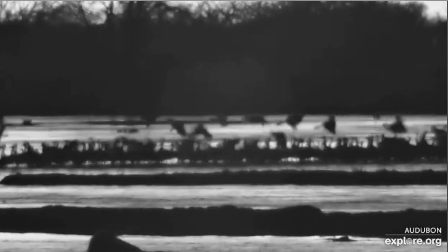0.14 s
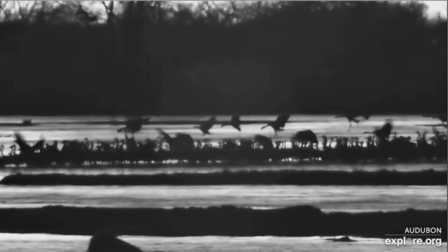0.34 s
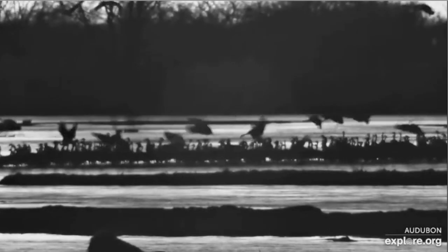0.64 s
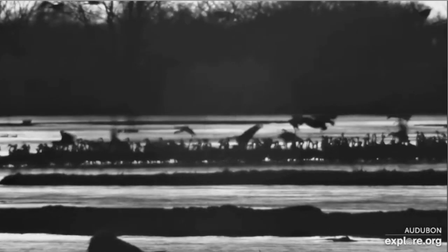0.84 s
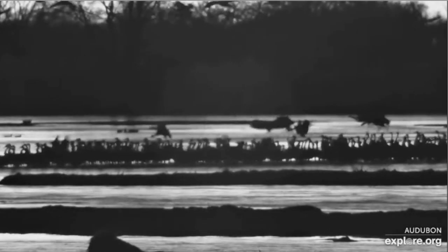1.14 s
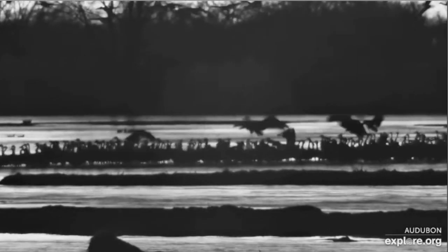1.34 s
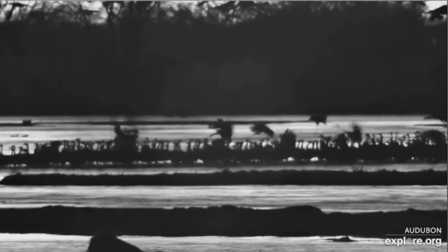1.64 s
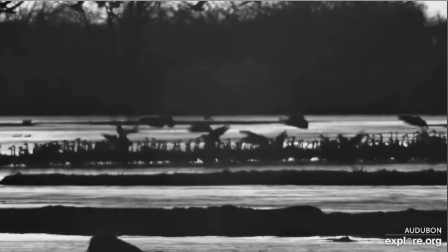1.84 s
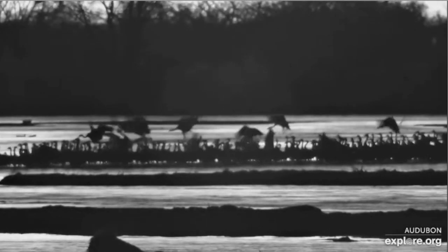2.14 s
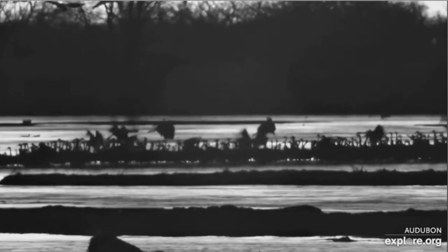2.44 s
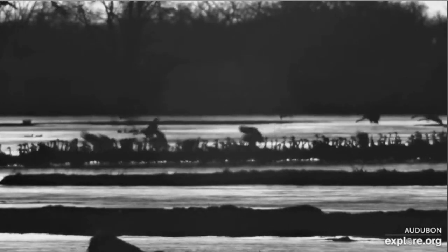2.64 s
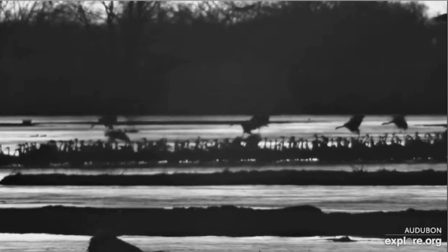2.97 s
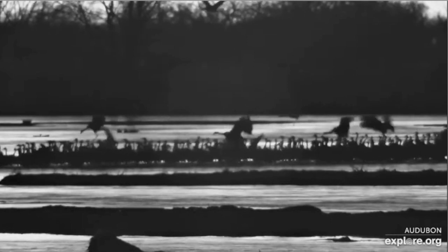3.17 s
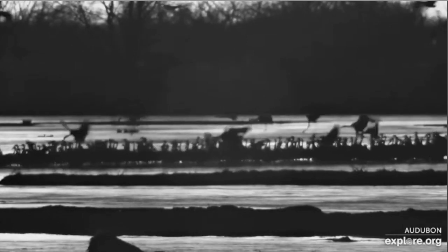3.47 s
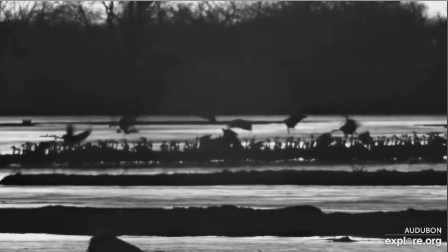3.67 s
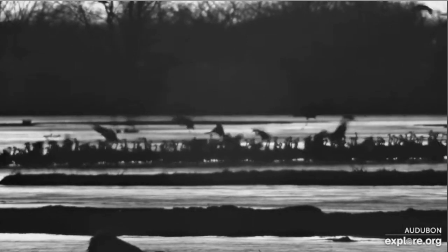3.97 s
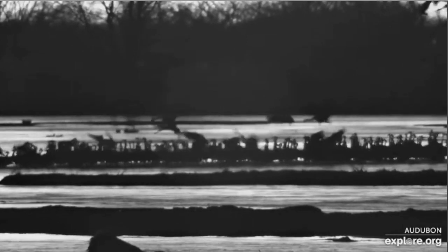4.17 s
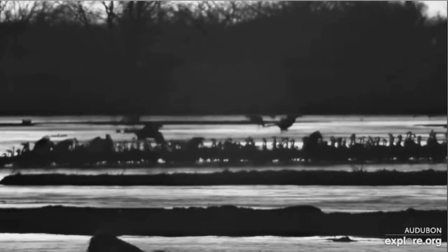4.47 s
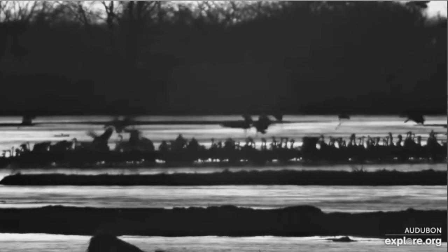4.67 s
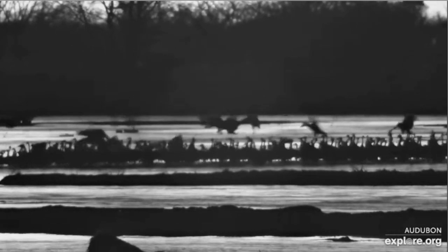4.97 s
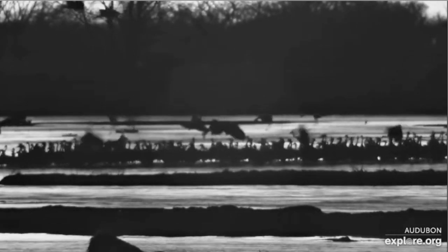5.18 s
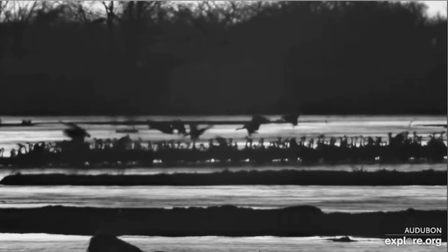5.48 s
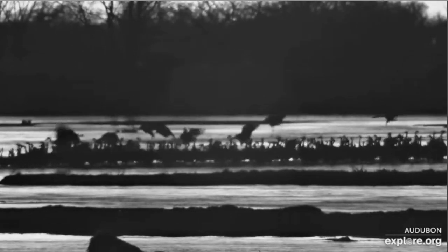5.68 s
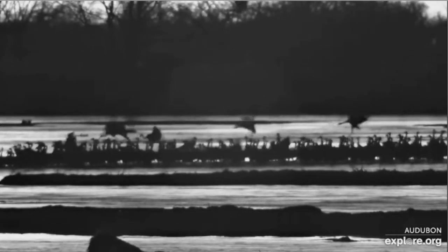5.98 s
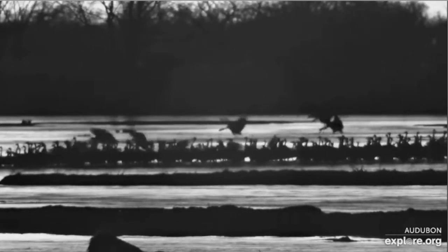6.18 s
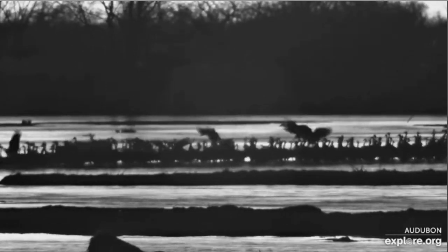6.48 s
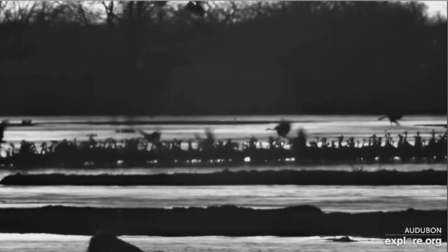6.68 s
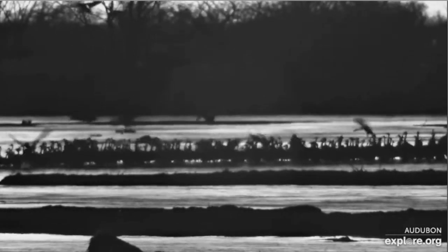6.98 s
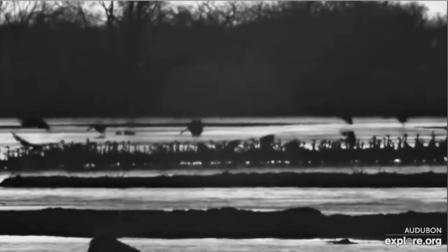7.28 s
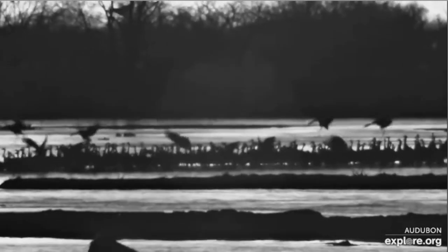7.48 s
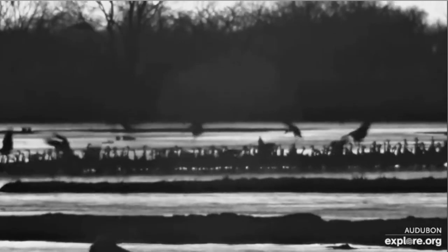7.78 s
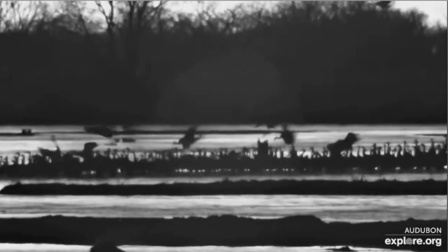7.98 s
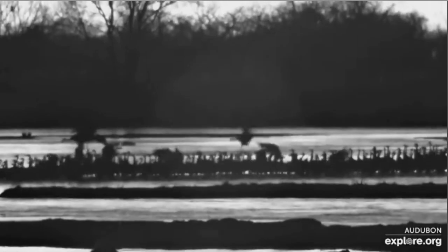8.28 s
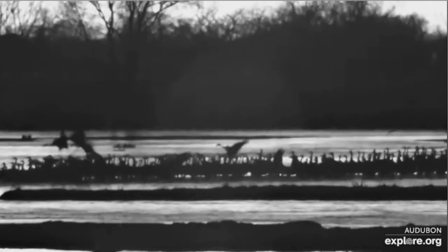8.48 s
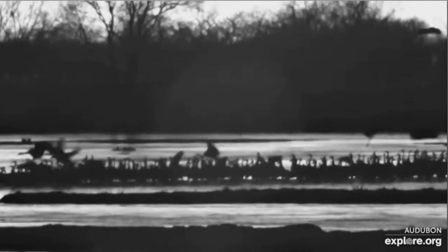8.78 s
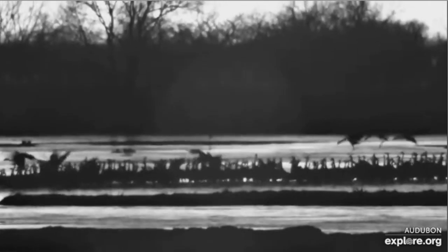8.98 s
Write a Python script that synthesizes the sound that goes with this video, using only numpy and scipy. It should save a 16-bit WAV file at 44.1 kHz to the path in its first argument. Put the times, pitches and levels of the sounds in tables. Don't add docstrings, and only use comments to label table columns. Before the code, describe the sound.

Hundreds of distant cranes trumpet and rattle together outdoors, with closer purring calls, short bugles, thin young whistles and later deep honks.

```python
import sys
import numpy as np
from scipy import signal
from scipy.fft import rfft, irfft, next_fast_len
from scipy.io import wavfile
from scipy.ndimage import uniform_filter1d

SR = 44100
rng = np.random.default_rng(int(sys.argv[2]) if len(sys.argv) > 2 else 0)


def persist_wave(psi):
    counts = np.round(np.clip(psi, -1, 1) * 32767).astype(np.int16)
    wavfile.write(sys.argv[1], SR, np.atleast_2d(counts).T)


def undo_db(level):
    steps = np.asarray(level, float) / 20
    return 10 ** steps


N = 402191


def evened(x):
    return x / np.sqrt(np.mean(x ** 2) + 1e-20)


def steadied(x):
    return x / np.sqrt(abs(uniform_filter1d(x ** 2, size=5000)))


def read(points, hz):
    f, value = np.transpose(points)
    return np.interp(np.log(hz + 1), np.log(f + 1), value, left=-150, right=-150)


def curve(rows, column):
    return np.interp(np.arange(N) / SR, *np.transpose(rows)[[0, column]])


def colour(x, points):
    size = next_fast_len(N)
    gain = undo_db(read(points, np.fft.rfftfreq(size, 1 / SR)))
    return irfft(rfft(x, size) * gain, size)[:N]


def add(mix, s, sound):
    part = mix[max(round(s * SR), 0):][:len(sound)]
    part += sound[:len(part)]


def arch(length, start_hz, mid_hz, end_hz, wobble):
    u = np.linspace(-1, 1, round(length * SR))
    hz = mid_hz + (start_hz - mid_hz) * u * (u - 1) / 2 + (end_hz - mid_hz) * u * (u + 1) / 2
    shake = np.interp(np.arange(len(u)) / 120, np.arange(100), rng.standard_normal(100))
    return hz, np.cumsum(hz * (1 + wobble * shake)) / SR


def pulses(turns, count):
    half = np.pi * turns
    return (np.sin((2 * count + 1) * half) / (np.sin(half) + 1e-9) - 1) / 2


def valley(x, t60, wet_db):
    t = np.arange(SR // 3) / SR
    tail = rng.standard_normal(len(t)) * undo_db(-60 * t / t60) * (t > .004)
    return x + undo_db(wet_db) * signal.oaconvolve(x, tail / np.linalg.norm(tail))[:N]


# f/Hz, level/dB
RUMBLE = [(8.8, -34.5), (15, 3.5), (32, 0.5), (79, -5), (177, -9.5), (210, -11), (245, -17.5), (402, -25),
          (522, -17.5), (600, -11.5), (780, -21.5), (1320, -120)]
RUMBLE_DB = -39.5
# f/Hz, level/dB
HISS = [(2400, -11), (5000, -18), (6500, -1.3), (8500, -2), (10000, -3), (12000, -4.5), (13000, -7),
        (14000, -20), (14500, -27)]
HISS_DB = -70
# t/s, first order level/dB, third order level/dB
ENGINE = [(0.0, -50, -54.5), (1.4, -58, -61), (2.5, -48, -56.5), (3.4, -53.5, -49), (6.04, -48, -52.5),
          (6.6, -46, -59), (6.85, -49, -52.5), (7.87, -43.5, -49), (8.6, -43, -63), (9.12, -43, -50)]
FIRING_HZ = 70.86


def floor():
    rumble, hiss, sway = rng.standard_normal((3, N))
    turns = np.cumsum(FIRING_HZ + .8 * evened(uniform_filter1d(sway, size=4000))) / SR
    engine = undo_db(curve(ENGINE, 1)) * np.sin(2 * np.pi * turns)
    engine += undo_db(curve(ENGINE, 2)) * np.sin(6 * np.pi * turns)
    rumble = undo_db(RUMBLE_DB) * evened(colour(rumble, RUMBLE))
    hiss = undo_db(HISS_DB) * evened(colour(hiss, HISS))
    return rumble + hiss + 1.12 * engine


def crowd(count, spread_db, rattlers, depth, wobble):
    lead_in = .2
    bars = np.zeros((6, N + SR))
    for at, voice, long, far, beat, rise, fall, bar in rng.random((count, 8)):
        hz = 1060 * .23 ** voice ** 1.3
        start_hz, end_hz = hz * (1 - 0.09 * rise), hz * (1 - 0.1185 * fall)
        turns = arch(0.0588 + 0.1291 * long, start_hz, hz, end_hz, wobble)[1]
        beats = 2 * np.pi * (24 + 7 * rise) * np.arange(len(turns)) / SR
        rattling = beat < rattlers
        turns = turns + rattling * hz * 0.00059 * np.cos(beats)
        gate = 1 - rattling * depth * (1 - np.maximum(-np.cos(beats), 0))
        source = pulses(turns + far, int(7600 / hz)) * np.sqrt(hz / 7600)
        sound = source * gate * np.sqrt(np.hanning(len(turns)))
        add(bars[int(6 * bar)], at * (N / SR + lead_in), undo_db(spread_db * far) * sound)
    return bars[:, round(lead_in * SR):][:, :N]


# t/s, level/dB, lead of the nearest sandbars/dB
FLOCK = [(0.0, -22, 0.5), (1.47, -24.5, 2.3), (1.5, -20, 0.5), (1.98, -25, 2), (2.28, -21, 0.1),
         (2.36, -23.5, -3), (2.67, -21.5, 2.5), (3.28, -24.5, 1), (3.3, -20.5, 2), (3.71, -24, 0.7),
         (4.37, -23, -3), (4.83, -24.5, 1.5), (4.98, -21.5, -0.5), (5.05, -25, 1), (8.05, -25, 1.5),
         (8.1, -26, 7), (8.23, -26.5, 1.5), (9.12, -25.5, 4.2)]
# f/Hz, level/dB
ROAR = [(210, -56), (350, -34), (412, -33), (523, -28), (688, -7.5), (809, 2.5), (993, 6), (1420, -1),
        (1630, 1), (1890, -10.5), (2350, -29), (2590, -51.5), (2700, -48), (3510, -71.5), (5940, -120)]
# f/Hz, level/dB
UPPER = [(2400, -25.5), (2650, -28.5), (3000, -8.5), (3500, 0), (3800, -4), (4150, -1.3), (4700, -5.5),
         (5100, -13), (5800, -14), (6500, -28.5), (7500, -35.5)]
UPPER_DB, UPPER_FADE_DB_PER_S = -32, 0.73


def flock():
    bars = crowd(count=1050, spread_db=8.5, rattlers=.75, depth=.85, wobble=.015)
    bars = np.array([valley(bar, 0.86, -7.0) for bar in bars])
    fused = rng.standard_normal(N)
    voices = steadied(evened(bars.sum(0)) + undo_db(-1.0) * fused)
    nearer = steadied(evened(bars[:3].sum(0)) + undo_db(-3.5) * fused)
    low = [(hz, db - 7.2 * min(np.log2(hz / 700), 0)) for hz, db in ROAR]
    roar = undo_db(curve(FLOCK, 1) - 0.03) * evened(colour(voices, low))
    fade_db = UPPER_FADE_DB_PER_S * np.arange(N) / SR
    upper_db = curve(FLOCK, 1) + curve(FLOCK, 2) + UPPER_DB - fade_db
    return roar + undo_db(upper_db) * evened(colour(nearer, UPPER))


# first pulse t/s, last pulse t/s, pulses, peak level/dB
RATTLES = [(.0363, .1895, 4, -38), (.2723, .3122, 2, -41), (.38, .4738, 3, -39), (.5492, .6125, 2, -39),
           (.6499, .7861, 5, -33.5), (.816, .8644, 2, -38), (1.0136, 1.0859, 3, -40),
           (1.1124, 1.1513, 2, -38), (1.278, 1.3089, 2, -42), (1.3857, 1.4262, 2, -40),
           (1.5549, 1.7095, 6, -37.5), (1.7823, 1.8163, 2, -42), (1.8761, 1.943, 2, -41),
           (2.0123, 2.0403, 2, -42), (2.0971, 2.0971, 1, -39), (2.1251, 2.152, 2, -33),
           (2.1894, 2.3087, 4, -35), (2.3825, 2.3825, 1, -41), (2.4942, 2.5272, 2, -43),
           (2.5601, 2.599, 2, -38), (2.6953, 2.7247, 2, -39), (2.7881, 2.83, 2, -43),
           (2.9901, 3.1363, 5, -40), (7.79, 8.01, 7, -48), (3.4012, 3.5334, 4, -39),
           (3.8566, 3.934, 3, -44), (4.0577, 4.2053, 5, -45), (4.5266, 4.6039, 3, -43),
           (4.6643, 4.7122, 2, -44), (5.4879, 5.4879, 1, -45)]
# f/Hz, level/dB
BURST = [(2500, -35.5), (3000, -8.5), (3600, 2.5), (4300, 0.5), (5000, -1), (5800, -11.5), (6500, -20)]
# f/Hz, level/dB
NEAR_LOW = [(250, -50), (600, -30), (900, -13), (1300, -15), (1600, -7), (1800, 0), (1950, -3), (2200, -20),
            (2600, -38)]
RING_HZ, RING_SPREAD_HZ, UNEVEN_DB = 4150, 400, 1.2
TOP_DB, TOP_LAG = -25.5, .5


def rattles():
    burst, top, ring = np.zeros((3, N))
    t = np.arange(1400) / SR
    shape = 1.3 * (1 - np.exp(-t / .004)) * np.exp(-(t / .012) ** 2)
    beats = [(s, db) for first, last, count, db in RATTLES for s in np.linspace(first, last, count)]
    for (s, peak_db), (strong, tuned, bright) in zip(beats, rng.uniform(-1, 1, (len(beats), 3))):
        db, hz = peak_db + UNEVEN_DB * strong, RING_HZ + RING_SPREAD_HZ * tuned
        top_db = TOP_DB - TOP_LAG * (db + 40) + 2 * bright
        turns = arch(len(t) / SR, 502, 650, 610, .05)[1]
        rough = evened(evened(pulses(turns, count=16)) + 0.84 * rng.standard_normal(len(t)))
        drive = undo_db(db) * shape * rough
        add(burst, s - .002, drive)
        add(top, s - .002, undo_db(top_db) * drive)
        add(ring, s - .002, undo_db(db) * shape * np.sin(2 * np.pi * hz * t * (.93 + 5.0 * t)))
    upper = undo_db(-2.0) * colour(burst, BURST) + undo_db(-7.0) * ring
    top = undo_db(7.5) * colour(top, [(6200, -22), (7000, -4.0), (8700, -0.8), (9700, -16.5)])
    body = undo_db(12.0) * colour(burst, NEAR_LOW)
    return valley(upper + top + body, .14, -9.0)


def flat_top(size):
    return signal.windows.tukey(size, .65)


# t/s, length/s, f/Hz, strongest low partial/dB, strongest upper partial/dB
ARCHED = [(.09, .06, 1072, -44, -54), (1.6, .08, 949, -31, -61), (2.61, .09, 931, -26, -60),
          (2.89, .11, 950, -36, -60), (3.27, .12, 940, -25.5, -57), (3.86, .15, 905, -33, -68),
          (4.02, .11, 1005, -35, -70), (4.56, .08, 911, -32, -64), (4.98, .11, 555, -34, -65),
          (6.29, .09, 880, -35, -65), (6.6, .07, 920, -40, -65)]
FALLING = [(.14, .06, 940, -36, -56), (.18, .05, 835, -34, -54), (.3, .07, 920, -34, -63),
           (.47, .06, 855, -32, -58), (.82, .07, 940, -36, -57), (1.86, .08, 567, -30, -58),
           (3.54, .08, 853, -33, -61), (3.79, .05, 850, -35, -65), (3.94, .09, 1030, -38, -62),
           (4.0, .06, 915, -44, -64), (5.49, .13, 870, -36, -66), (6.41, .17, 759, -39, -70),
           (8.93, .05, 860, -44, -67)]
DEEP = [(4.39, .11, 421, -29, -68), (4.7, .09, 421, -31, -63), (4.86, .12, 272, -32, -56),
        (5.48, .05, 407, -27, -66), (5.69, .1, 269, -32, -61), (6.83, .1, 264, -31, -64),
        (8.05, .16, 262, -23, -62), (8.67, .05, 422, -24, -65), (8.84, .04, 401, -27, -68)]
SWOOPS = [(4.225, .135, 934, -38, -57), (5.49, .135, 922, -37, -57), (6.95, .135, 925, -38, -57)]
BENDS = [
    (.925, .945, 2.5, 0),
    (1.025, .925, 0, 2),
    (.95, .985, 6, 2),
    (.92, .865, 0, 9),
]
# f/Hz, level/dB
NEAR_HIGH = [(2500, -24), (2800, -12), (3300, -5), (3700, -2), (4000, -5), (4500, -1), (5500, -7),
             (6300, -14), (7000, -22), (8500, -21), (9500, -32)]
# t/s, length/s, middle f/Hz, end f/Hz, level/dB
WHISTLES = [(0.562, 0.016, 4230, 4930, -53), (0.603, 0.031, 4260, 4900, -45.5),
            (0.663, 0.022, 4450, 5000, -44), (0.708, 0.1, 4510, 4000, -51), (0.915, 0.033, 4200, 4350, -59),
            (.96, 0.035, 4030, 3950, -56), (2.282, 0.11, 4100, 3650, -53.5),
            (2.525, 0.16, 4200, 4320, -51.5), (2.73, 0.08, 3980, 3350, -54),
            (4.203, 0.081, 4370, 4400, -57), (4.52, 0.039, 4250, 4700, -61.5),
            (4.55, .032, 4000, 4700, -57.5), (8.421, 0.15, 1472, 1490, -33), (4.333, .025, 5300, 5050, -65),
            (4.717, 0.069, 3730, 3550, -60)]
SCOOP = .975


def bugles():
    out = np.zeros(N)
    for notes, (start, end, thin, dull) in zip((ARCHED, FALLING, DEEP, SWOOPS), BENDS):
        for s, length, mid_hz, low_db, high_db in notes:
            hz, turns = arch(length, start * mid_hz, mid_hz, end * mid_hz, 0.0053)
            k = np.arange(1, 9500 // mid_hz)[:, None]
            size, sharp = (1.13, 1.6) if mid_hz < 500 else (1, 1)
            khz = k * hz / 1000
            loss_db = thin * np.maximum(4.3 - khz, 0) + dull * np.maximum(khz - 4.8, 0)
            weight = undo_db(read(NEAR_HIGH, k * hz) + high_db - loss_db)
            weight *= undo_db(1.8 * rng.standard_normal(40)[:len(k), None])
            weight += undo_db(sharp * read(NEAR_LOW, k * hz * size) + low_db)
            partials = weight * np.sin(2 * np.pi * k * turns)
            add(out, s, partials.sum(0) * flat_top(len(hz)))
    for s, length, mid_hz, end_hz, db in WHISTLES:
        turns = arch(length, SCOOP * mid_hz, mid_hz, end_hz, 0.0072)[1]
        add(out, s, undo_db(db) * np.sin(2 * np.pi * turns) * signal.windows.tukey(len(turns), .6))
    return np.sqrt(2) * valley(out, .2, -8.0)


def scene():
    return (floor() + flock() + rattles() + bugles())[None]


def roll_off(x):
    return signal.sosfilt(signal.butter(12, 14400, fs=SR, output="sos"), x)


def record(dry):
    return roll_off(dry)


dry = scene()
out = record(dry)
persist_wave(out)
```